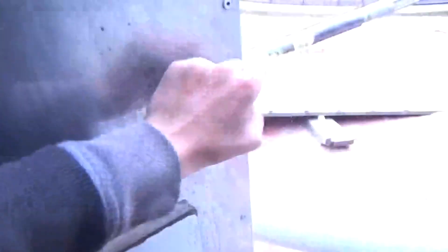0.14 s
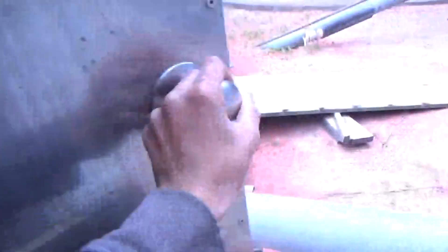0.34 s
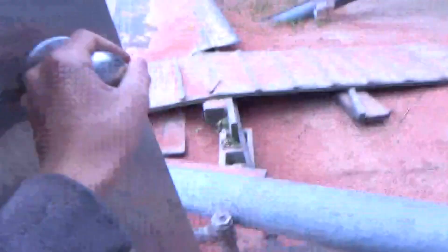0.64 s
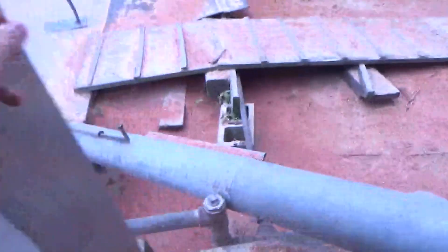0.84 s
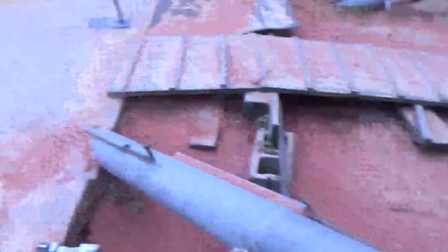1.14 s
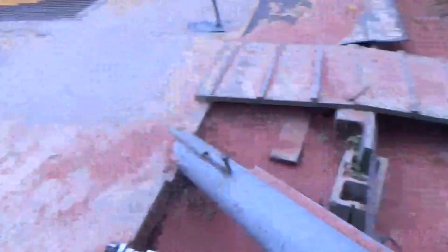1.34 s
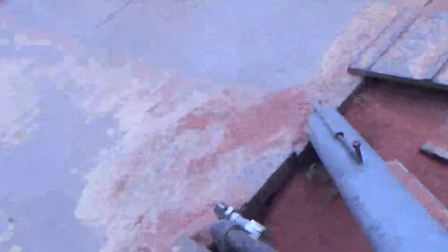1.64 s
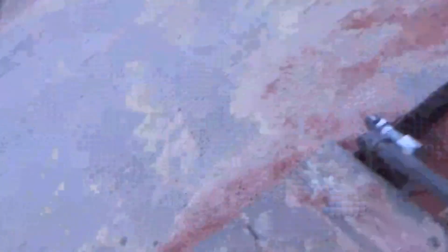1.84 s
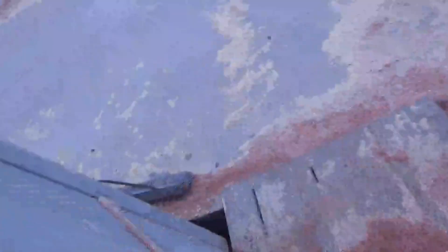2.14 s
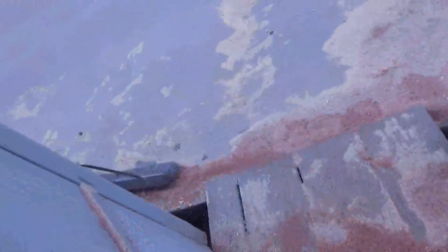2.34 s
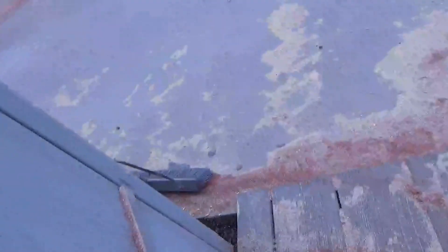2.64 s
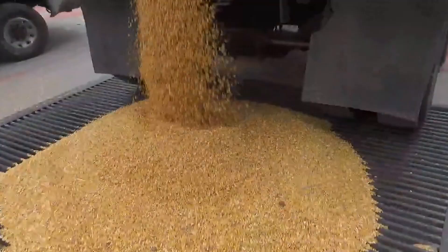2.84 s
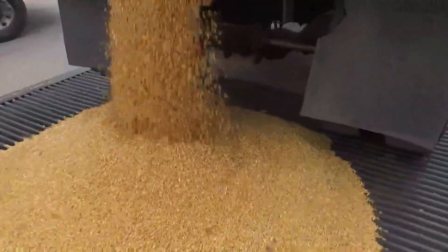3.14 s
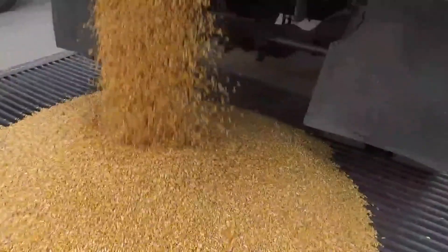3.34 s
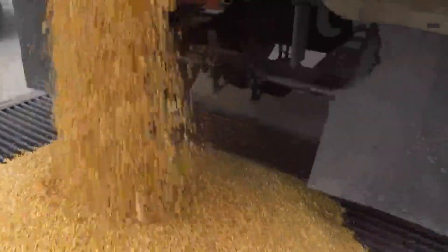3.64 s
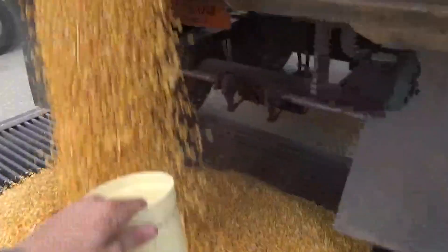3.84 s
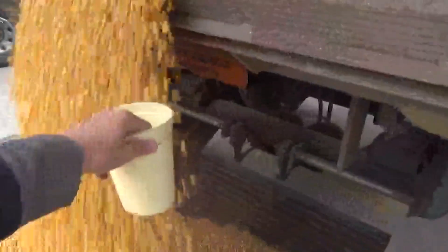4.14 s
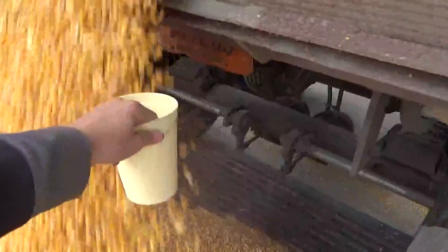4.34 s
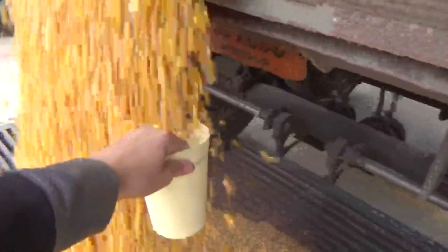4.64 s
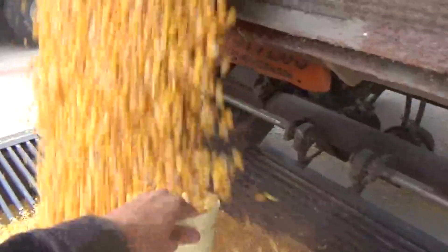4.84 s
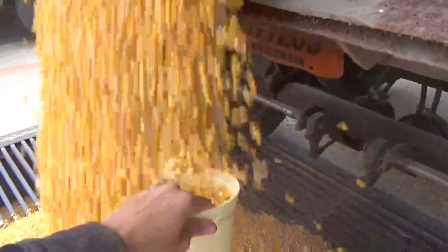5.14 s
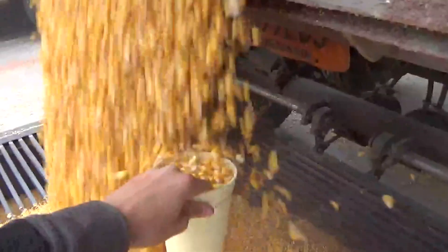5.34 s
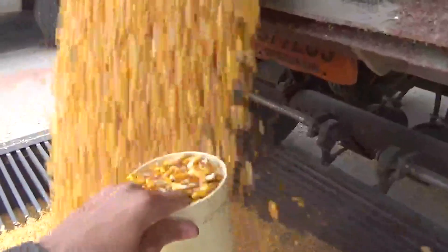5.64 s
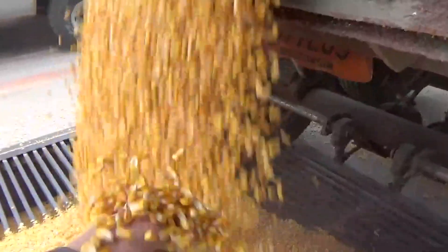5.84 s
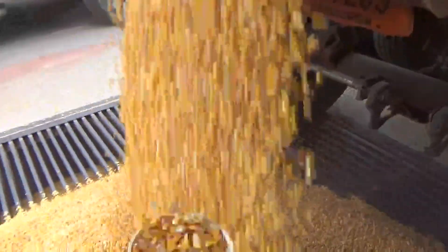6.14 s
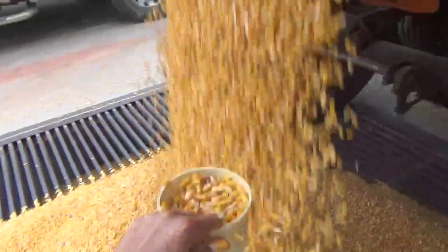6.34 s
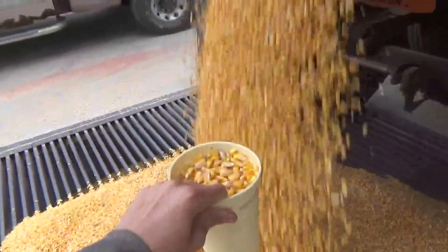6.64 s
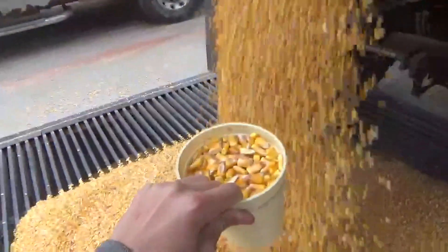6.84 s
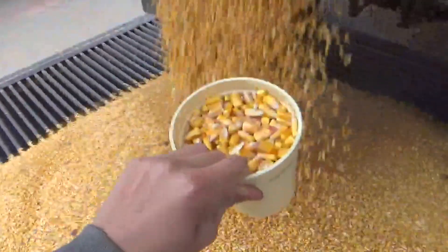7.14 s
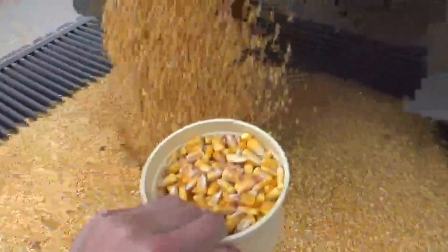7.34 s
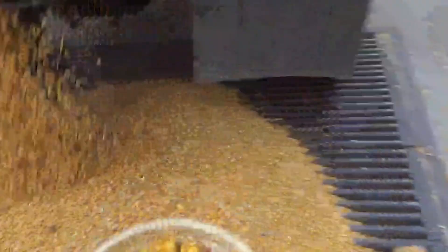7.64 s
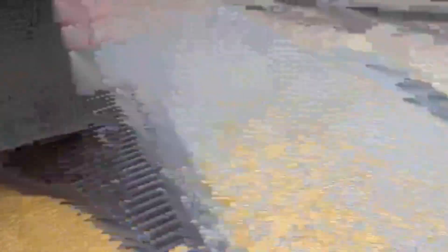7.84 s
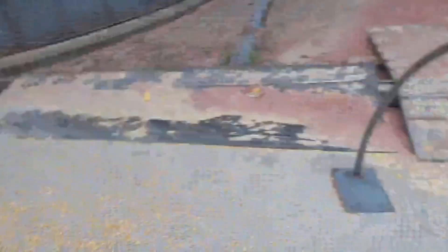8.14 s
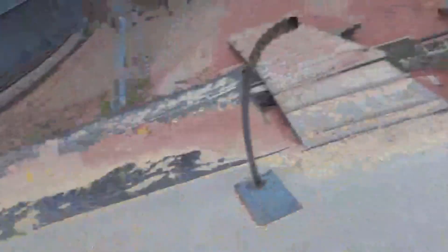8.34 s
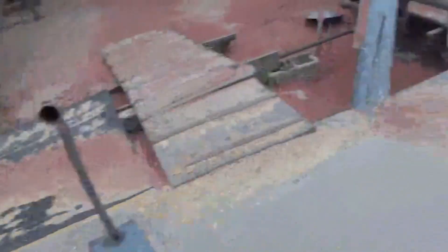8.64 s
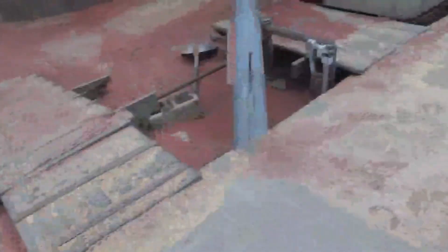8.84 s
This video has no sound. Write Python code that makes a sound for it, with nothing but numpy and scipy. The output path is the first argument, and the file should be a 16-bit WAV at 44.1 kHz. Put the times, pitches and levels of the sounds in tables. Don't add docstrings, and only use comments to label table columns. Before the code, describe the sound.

A handheld stereo microphone near an unloading truck catches thousands of dry kernels rushing onto a grated heap. The hiss begins duller and off to one side, then jumps sharp and near with a wind pop. Mid-way a cup is pelted, its empty bottom knocking before sharper wall rattles take over and fade. A few kernels spill over the brim; the end is windy, with a faint conveyor whine and yard drone.

```python
import sys
import numpy as np
from scipy import signal
from scipy.fft import rfft, irfft, next_fast_len
from scipy.io import wavfile
from scipy.ndimage import uniform_filter1d

SR = 44100
rng = np.random.default_rng(int(sys.argv[2]) if len(sys.argv) > 2 else 0)


def dump(signal):
    limited = np.clip(np.atleast_2d(signal).T, -1, 1)
    pcm = np.round(limited * 32767).astype(np.int16)
    wavfile.write(sys.argv[1], SR, pcm)


def elevation(decibels):
    levels = np.asarray(decibels, float)
    return 10 ** (levels / 20)


N = 396459

# time in seconds, hiss level in dB, top lift from facing it in dB,
# left over right in dB, body lift from the view of the grate in dB.
STREAM_PATH = [(0.0, -30.5, -0.5, -0.5, 1), (0.36, -33, -3, -1.5, .5), (1.35, -33.5, -2, -1.5, 0.6),
               (1.68, -34, -6.5, -4, 0), (2.0, -37, -1.5, -1, 2), (2.905, -36, -2, -1, 2.5),
               (2.909, -36, 7, 0.5, 1), (3.4, -34.5, 7, 1.2, 1.5), (3.77, -33, 3.5, 1, -1),
               (4.45, -33.5, 0.5, 2.3, 0.5), (4.75, -34.5, -1, 1, 3), (5.15, -33.5, 1, 1.5, 1.5),
               (6.65, -31.5, 2.5, -0.8, -2), (7.55, -35, 6, .5, 2.5), (7.73, -36.5, -1, 5, 0.5),
               (7.91, -37.5, 3, -1, 3), (8.3, -36.5, -1, -1, 3.5), (8.99, -33, -3, 0, 4)]
# frequency in Hz, level in dB per Hz.
KERNEL_COLOUR = [(1200, -26), (2000, -22), (3000, -18.5), (4000, -12.5), (5500, -8), (6500, -5.5),
                 (7400, -3.5), (8300, -3.5), (9300, -3), (10300, -6), (11500, -10)]
# frequency in Hz, likeness from 0 to 1.
KERNEL_LIKENESS = [(1500, 0.89), (4000, 0.75), (7000, 0.93), (10000, 1)]

# time in seconds, peak in dB.
BOTTOM_HITS = [(4.562, -30), (4.578, -37), (4.588, -39), (4.599, -30.5), (4.622, -34), (4.646, -33),
               (4.654, -36), (4.672, -36.5), (4.682, -46), (4.694, -37), (4.712, -45), (4.74, -40),
               (4.753, -39)]
# frequency in Hz, level in dB, decay by 60 dB in seconds.
BOTTOM_MODES = [
    (712, 5.5, 0.059),
    (737, -16, .045),
    (1120, -2, 0.037),
    (1680, -9, 0.022),
    (1710, -1.5, 0.028),
]
# time in seconds, peak in dB.
AIR_BOOMS = [(4.564, -51), (4.613, -35), (4.647, -45), (4.683, -46), (4.705, -41), (4.728, -45),
             (4.76, -44), (4.781, -41), (4.805, -45), (4.831, -51)]
# time in seconds, level in dB.
WALL_RATTLE = [
    (4.3, -75),
    (4.4, -50),
    (4.5, -40.5),
    (4.6, -33),
    (4.83, -31.5),
    (5.05, -37.5),
    (5.4, -37),
    (5.6, -53),
    (5.8, -87),
]
# frequency in Hz, width in Hz, level in dB.
EMPTY_WALL = [(1660, 640, -3.5), (2450, 380, -5), (2800, 410, 4.5), (3200, 310, 3.5), (3820, 240, -2),
              (4410, 670, 5.5), (4700, 450, -7), (5900, 980, -19.5)]
# frequency in Hz, width in Hz, level in dB.
FULL_WALL = [(2630, 250, -5), (3000, 350, -14), (3600, 130, 1), (4074, 500, 10), (4750, 550, 1),
             (5050, 860, 8.5), (5700, 700, 3.5)]
# time in seconds, peak in dB, ring in Hz.
WALL_TICKS = [(4.44, -22, 4270), (4.4574, -17, 5100), (4.481, -21, 2730), (4.527, -20, 4730),
              (4.547, -21, 2800), (4.555, -19, 4610), (4.573, -26, 4520), (4.591, -31, 2790),
              (4.639, -19, 4630), (4.702, -19, 2750), (4.733, -19, 4330), (4.777, -25, 4450),
              (4.8045, -29, 4470), (4.8284, -29, 3980), (4.959, -24, 4160), (4.9736, -17, 5000),
              (5.0849, -16, 4930), (5.145, -20, 4190), (5.1783, -18, 4970), (5.2016, -25, 3810),
              (5.2565, -23, 4850), (5.282, -17, 4000), (5.323, -18.5, 4100), (5.3707, -29, 4960),
              (5.4091, -18, 5060), (5.4505, -28, 4830), (5.4715, -18, 4810),
              (4.6942, -36, 1760), (4.7122, -32, 1810), (4.766, -25, 1590), (4.7994, -30, 1700),
              (4.8354, -27, 2620), (4.8713, -37, 2700), (4.9194, -33, 2680), (5.0657, -25, 2630),
              (5.2021, -25, 2530)]
# start in seconds, level in dB, length in seconds, ring in Hz, ring in dB.
BRIM_SPILLS = [
    (5.895, -34.5, 0.04, 3400, -7),
    (6.155, -47, 0.041, 4300, 4),
    (6.258, -45, 0.031, 3200, 3),
    (8.278, -38.5, 0.036, 2180, -12),
]

# time in seconds, peak in dB, hold in seconds, brightness in dB.
GUST_LIST = [(0.444, -56.5, 0.023, -2.5), (2.928, -37, .1, -11), (3.046, -36.5, 0.043, -7),
             (3.098, -38, 0.13, -13), (3.292, -42.5, .02, -20), (3.376, -46, .02, -7),
             (3.527, -46.5, .05, -13), (3.68, -46, .05, -12), (3.852, -40, .005, -6),
             (3.943, -43.5, 0.022, -8), (4.0, -45, .02, -2), (6.0, -53, .01, -18), (7.08, -44, .005, -5),
             (7.126, -42.5, 0.063, -8), (7.238, -40, .005, -11), (7.335, -46, 0.041, -15),
             (7.408, -38.5, .01, -11), (7.599, -42.5, 0.02, -12), (7.705, -47.5, 0.022, -19),
             (8.002, -43, .02, -14), (8.093, -40, .03, 0.5), (8.146, -34.5, .005, -4),
             (8.257, -39.5, 0.016, -14), (8.32, -38.5, .005, 0), (8.415, -41.5, 0.03, -10),
             (8.58, -41.5, 0.12, 0), (8.73, -41, 0.0036, -3), (8.78, -38, 0.011, -10),
             (8.838, -38.5, .005, -2.5), (8.913, -43, 0.017, -7)]
# time in seconds, level in dB.
BREEZE_LEVEL = [(0, -59), (.3, -73), (1.4, -70), (1.8, -66), (2.7, -56.5), (2.9, -66), (3.3, -52),
                (4.3, -55), (4.5, -64), (6.5, -63), (7.0, -54), (7.9, -56), (8.05, -43.5), (8.99, -46.5)]
# time in seconds, lag between the ports in ms.
PORT_LAG = [(0, -0.029), (4.0, 0.4), (4.3, -0.24), (5.4, -0.64), (5.7, 0.36), (7.8, 0.41), (7.95, -0.35),
            (8.99, -0.26)]
# time in seconds, peak in dB.
EDDY_POPS = [
    (2.925, -28.5),
    (3.856, -32),
    (3.884, -34),
    (3.948, -39),
    (4.093, -34.5),
    (6.008, -38),
    (7.6, -34),
    (8.014, -27),
]

# time in seconds, level in dB, left over right in dB.
YARD_LEVEL = [(0.0, -47.5, -1), (1.25, -49, -2.5), (2.15, -47.5, -2.5), (3.13, -45.5, -1),
              (3.45, -51, -1.5), (3.88, -47.5, -0.5), (4.3, -51, -3), (4.7, -48.5, 0), (5.68, -51, -2),
              (6.03, -48.5, -1.5), (6.63, -51, -0.5), (7.89, -46.5, -3), (8.26, -42, -1.5), (8.99, -43, 2)]
# frequency in Hz, level in dB per Hz.
YARD_COLOUR = [(45, -18), (100, -13.5), (200, -1.5), (300, -0.5), (420, -2), (550, -5), (800, -1.5),
               (1500, -2.5), (2200, -0.5), (4000, -3.5)]
# frequency in Hz, likeness from 0 to 1.
YARD_LIKENESS = [(100, 1), (400, 1), (1000, 0.91), (3000, 0.57)]
# time in seconds, level in dB.
WHINE_LEVEL = [(0, -72), (1.7, -57), (2.9, -60), (4.3, -69), (5.9, -72), (6.3, -60), (7.7, -58),
               (8.99, -48)]
# time in seconds, share of the yard heard by bounces from 0 to 1.
TRUCK_SHADOW = [(3.0, 0.1), (4.4, 1), (4.9, 1), (6.0, 0)]


def rms_one(x):
    return x / np.sqrt(np.mean(x ** 2) + 1e-20)


def in_time(rows):
    s, *columns = np.transpose(rows)
    return [np.interp(np.arange(N) / SR, s, column) for column in columns]


def at_hz(points, hz):
    points_hz, values = np.transpose(points)
    return np.interp(np.log(hz), np.log(points_hz), values)


def drift(rate):
    r = np.exp(-80 * np.pi * rate / SR)
    noise = rng.standard_normal(N // 40 + 2002)
    slow = signal.lfilter([1], [1, -2 * r, r * r], noise)[2000:]
    return np.interp(np.arange(N) / 40, np.arange(len(slow)), rms_one(slow))


def grains(per_s, spread_db, size):
    strength = elevation(spread_db * np.minimum(rng.exponential(1, size), 5))
    signed = strength * rng.choice([-1, 1], size)
    return rms_one(signed * (rng.random(size) < per_s / SR) + 1e-18)


def butter(x, edges_hz, kind, order=2):
    edges_hz = np.clip(edges_hz, 10, .45 * SR)
    return signal.sosfilt(signal.butter(order, edges_hz, kind, fs=SR, output="sos"), x)


def resonance(x, hz, width_hz):
    r = np.exp(-np.pi * width_hz / SR)
    zeros = np.array([1, 0, -1]) * (1 - r * r) / 2
    return signal.lfilter(zeros, [1, -2 * r * np.cos(2 * np.pi * hz / SR), r * r], x)


def ring(at, strengths, hz, t60):
    clicks = np.full(N, 1e-18)
    clicks[at] = strengths
    r, w = elevation(-60 / (t60 * SR)), 2 * np.pi * hz / SR
    return signal.lfilter([0, np.sin(w)], [1, -2 * r * np.cos(w), r * r], clicks)


def panned(x, left_db):
    return x * elevation(np.array([left_db / 2, -left_db / 2]))


def bank(source, edges, band_db, likeness, flicker_db, flicker_rate):
    out = 0
    for k, (low, high) in enumerate(zip(edges, edges[1:])):
        mid, side = butter(source[k % 2], [low, high], "band")
        hz = np.sqrt(low * high)
        alike = np.clip(likeness(hz), 0, 1)
        gain = elevation(band_db(hz) + flicker_db * drift(flicker_rate))
        common, apart = np.sqrt(1 + alike) * mid, np.sqrt(1 - alike) * side
        out = out + gain * np.array([common + apart, common - apart])
    return out


def stream():
    hiss_db, top_db, left_db, body_db = in_time(STREAM_PATH)
    echo_share = 0.069

    def band_db(hz):
        octaves = np.log2(hz / 8400)
        top = np.clip(octaves / .3, 0, 1.2) * top_db
        body = np.clip(-octaves / .55, 0, 1.2) * body_db
        return at_hz(KERNEL_COLOUR, hz) + top + body

    def likeness(hz):
        return at_hz(KERNEL_LIKENESS, hz) - echo_share

    clicks = grains(20000, 3.24, size=(2, 2, N))
    edges = np.geomspace(3800, 14300, 19) - 2500
    fall = bank(clicks, edges, band_db, likeness, flicker_db=0.64, flicker_rate=17.0)
    port_db = -4.5 - 0.5 * top_db
    fall = fall + elevation(port_db) * resonance(fall, hz=8280, width_hz=1500)
    surges = elevation(0.14 * drift(33.0) + 0.15 * drift(38.0))
    fall = fall / np.std(butter(fall, [7000, 9200], "band", order=4))
    return panned(elevation(hiss_db + 1.13) * surges * fall, left_db)


def cup_bottom():
    s, peak_db = np.transpose(BOTTOM_HITS)
    at = np.round(s * SR).astype(int)
    chance = rng.normal(0, 1, (len(BOTTOM_MODES), len(at)))
    out = np.zeros(N)
    for (hz, level_db, t60), luck in zip(BOTTOM_MODES, chance):
        out += ring(at, elevation(peak_db + level_db - 3.5 + 1.1 * luck), hz, t60)
    s, peak_db = np.transpose(AIR_BOOMS)
    out += ring(np.round(s * SR).astype(int), elevation(peak_db - 1.5), hz=560, t60=0.12)
    return butter(out, 440, "high", order=4)


def cup_wall():
    level_db, = in_time(WALL_RATTLE)
    covered_s, covering_s = 4.76, 0.076
    fill = np.interp(np.arange(N) / SR, [covered_s, covered_s + covering_s], [0.1, 0.74])
    everywhere = grains(1300, 2.6, size=N)

    def spot(hz, width_hz, db):
        struck = 1.14 * everywhere + grains(1300, 3.8, size=N)
        rung = resonance(struck, hz, width_hz)
        return elevation(db) * rms_one(resonance(rung, hz, 2.5 * width_hz))

    empty = rms_one(sum(spot(*mode) for mode in EMPTY_WALL))
    full = rms_one(sum(spot(*mode) for mode in FULL_WALL))
    return elevation(level_db) * (np.sqrt(1 - fill) * empty + np.sqrt(fill) * full)


def wall_ticks():
    out = np.zeros(N)
    for s, peak_db, hz in WALL_TICKS:
        out += ring(round(s * SR), elevation(peak_db - 5.5), hz, t60=46.0 / hz)
    return out


def spills():
    out, now = np.zeros(N), np.arange(N) / SR
    clicks = grains(3000, 2.2, size=N)
    broad = rms_one(butter(clicks, [800, 5000], "band"))
    for s, level_db, length, ring_hz, ring_db in BRIM_SPILLS:
        swell = np.sin(np.pi * np.clip((now - s) / length, 0, 1))
        brim = elevation(ring_db) * rms_one(resonance(clicks, ring_hz, 600))
        out += elevation(level_db) * swell * (broad + brim)
    return out


def gusts():
    rise_db_per_s, fall_db_per_s = 298, 253
    jump_s = 2.907
    level_db, = in_time(BREEZE_LEVEL)
    now = np.arange(N) / SR
    bright_db = np.full(N, -4.5)
    for s, peak_db, hold, gust_bright_db in GUST_LIST:
        rise = rise_db_per_s * np.maximum(s - now, 0)
        fall = fall_db_per_s * np.maximum(now - s - hold, 0)
        gust_db = peak_db - rise - fall
        rules = (gust_db > level_db) & ((now > jump_s) | (s < jump_s))
        level_db = np.where(rules, gust_db, level_db)
        bright_db = np.where(rules, gust_bright_db, bright_db)
    return level_db, uniform_filter1d(bright_db, size=800)


def wind():
    level_db, bright_db = gusts()
    lag_ms, = in_time(PORT_LAG)
    eddies = grains(1300, 2.4, size=(3, N))
    strength = np.sqrt(uniform_filter1d(eddies ** 2, size=1100, axis=1) + .05)
    eddies = eddies / strength * elevation(level_db - 1.5)
    for s, peak_db in EDDY_POPS:
        eddies[0, round(s * SR)] += elevation(peak_db + 15.0)
    now = np.arange(N)

    def on_ports(slowness, broken_db):
        half_lag = slowness * lag_ms * SR / 2000
        shared = np.array([np.interp(now - sign * half_lag, now, eddies[0]) for sign in (1, -1)])
        return butter(shared + elevation(broken_db) * eddies[1:], 170, "high")

    thumps = elevation(22.0) * butter(on_ports(1.22, -4.0), 450, "low")
    small = butter(on_ports(0.94, -0.77), 265, "high")
    flutter = elevation(18.5) * butter(small, 840, "low")
    return thumps + elevation(bright_db) * flutter


def yard():
    level_db, left_db = in_time(YARD_LEVEL)
    shadow, = in_time(TRUCK_SHADOW)
    lost_open, lost_under = 0.042, 0.33
    lost = lost_open + (lost_under - lost_open) * shadow
    rumble_db = -2

    def band_db(hz):
        return at_hz(YARD_COLOUR, hz) + np.clip(np.log2(800 / hz), 0, 1) * rumble_db

    def likeness(hz):
        return at_hz(YARD_LIKENESS, hz) - lost

    noise = rng.standard_normal((2, 2, N)) * elevation(1.06 * drift(14.0))
    edges = np.geomspace(45, 4000, 16)
    drone = bank(noise, edges, band_db, likeness, flicker_db=1.06, flicker_rate=6.7)
    drone = drone / np.std(butter(drone, [900, 2200], "band", order=4))
    whine_db, = in_time(WHINE_LEVEL)
    whine = rng.standard_normal(N)
    for _ in range(2):
        whine = resonance(whine, hz=428, width_hz=36)
    return panned(elevation(level_db - 1.0) * drone, left_db) + elevation(whine_db) * rms_one(whine)


def scene():
    cup = cup_bottom() + cup_wall() + wall_ticks() + spills()
    waver = elevation(0.46 * drift(21.0))
    return waver * (stream() + yard()) + panned(cup, np.full(N, -.7)) + wind()


def roll_off(x):
    return signal.sosfilt(signal.butter(12, 11670, fs=SR, output="sos"), x)


def record(dry):
    rounded = .3 * np.tanh(dry / .3)
    size = next_fast_len(N)
    passed = np.arange(size // 2 + 1) * SR / size < 11025
    mix = irfft(rfft(rounded, size) * passed, size)[:, :N]
    return roll_off(mix)


dry = scene()
out = record(dry)
dump(out)
```